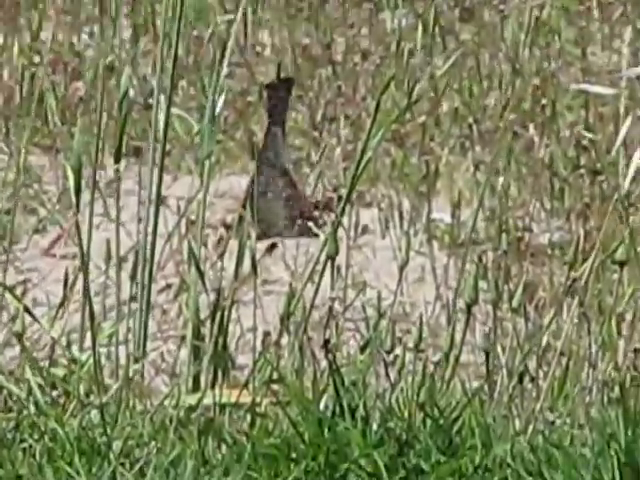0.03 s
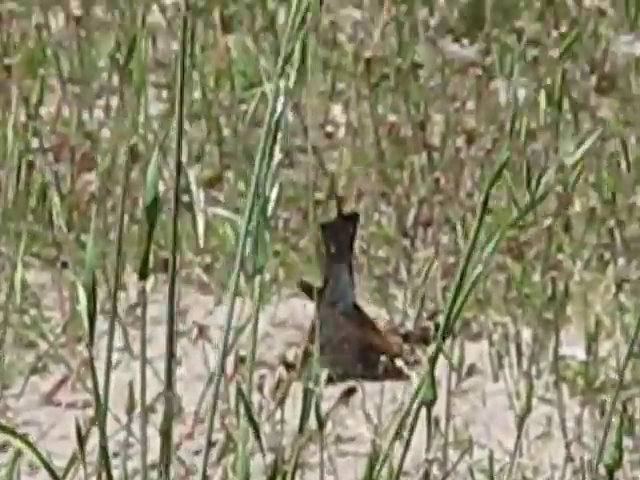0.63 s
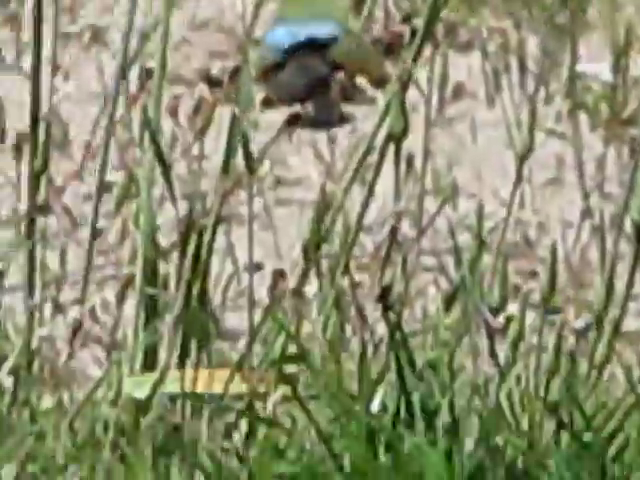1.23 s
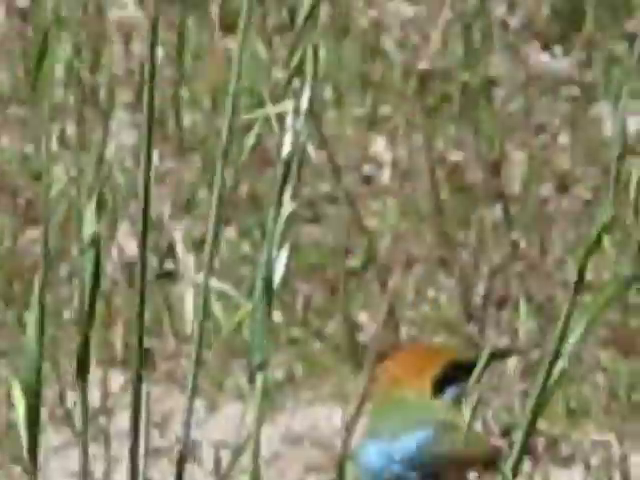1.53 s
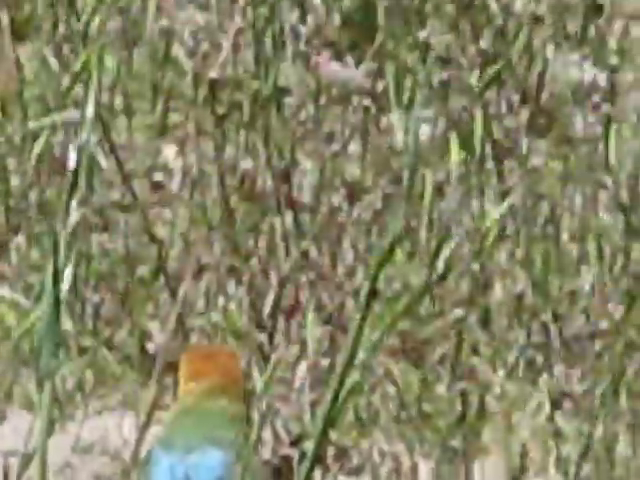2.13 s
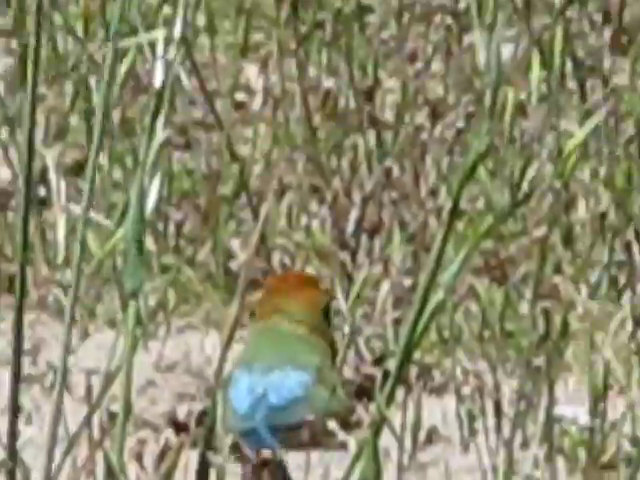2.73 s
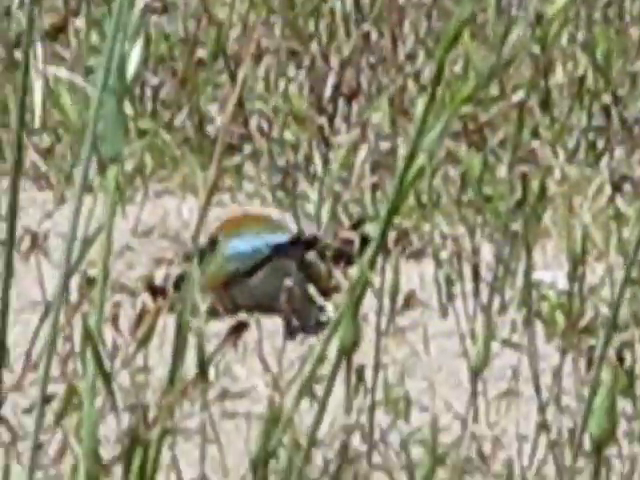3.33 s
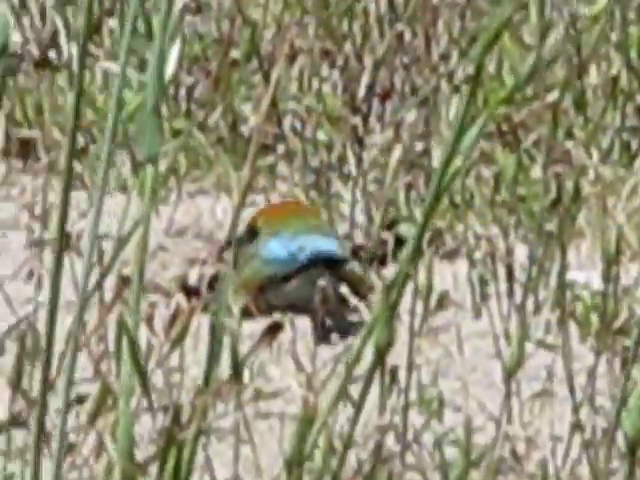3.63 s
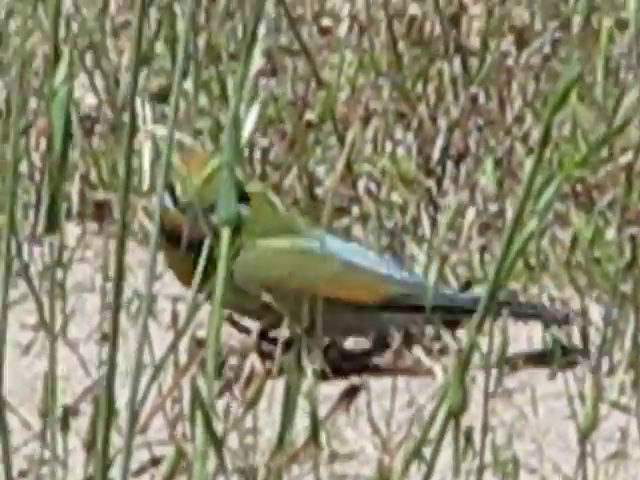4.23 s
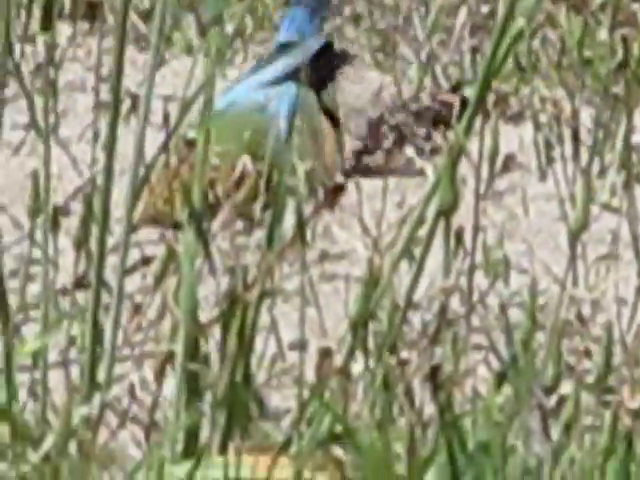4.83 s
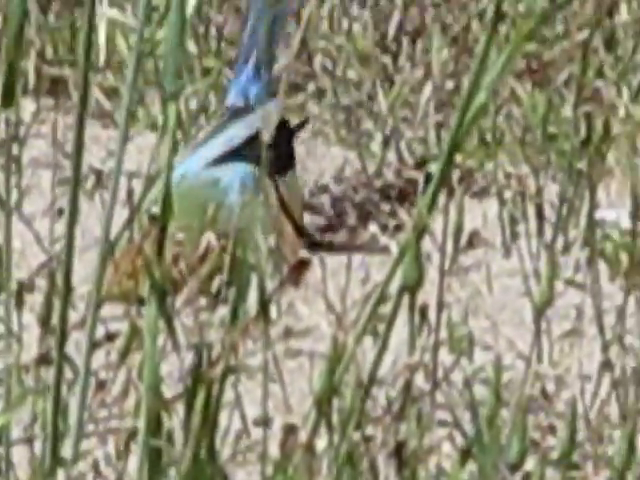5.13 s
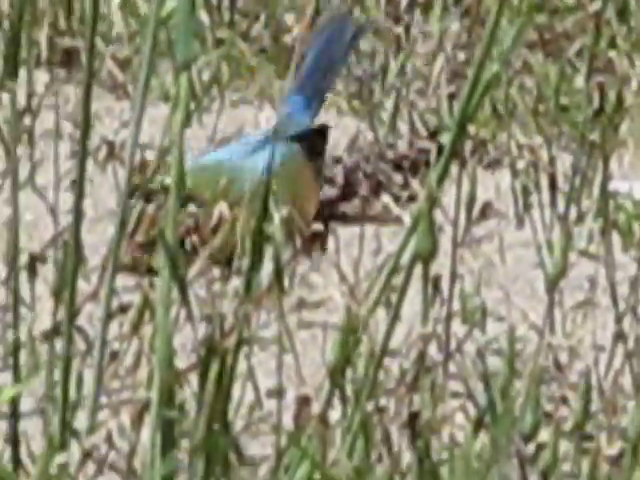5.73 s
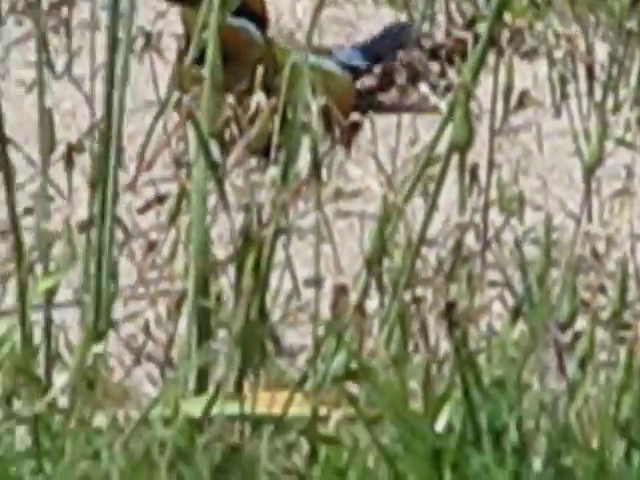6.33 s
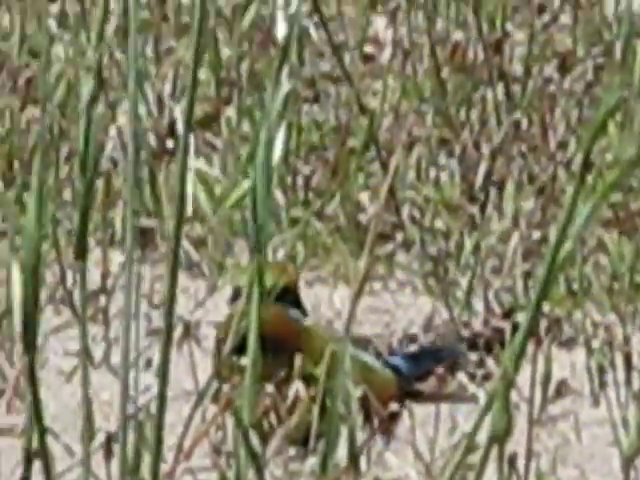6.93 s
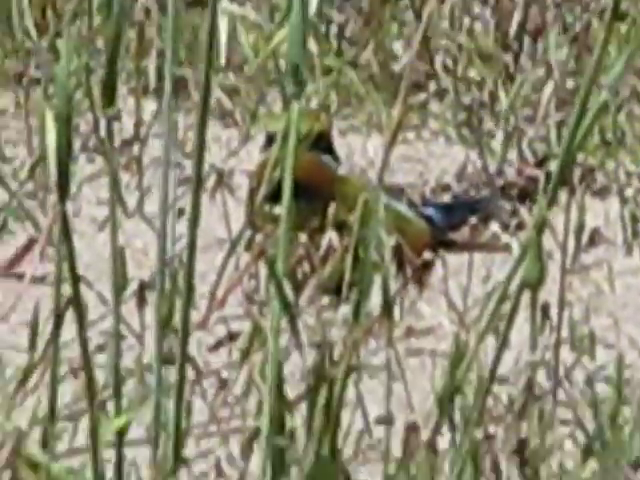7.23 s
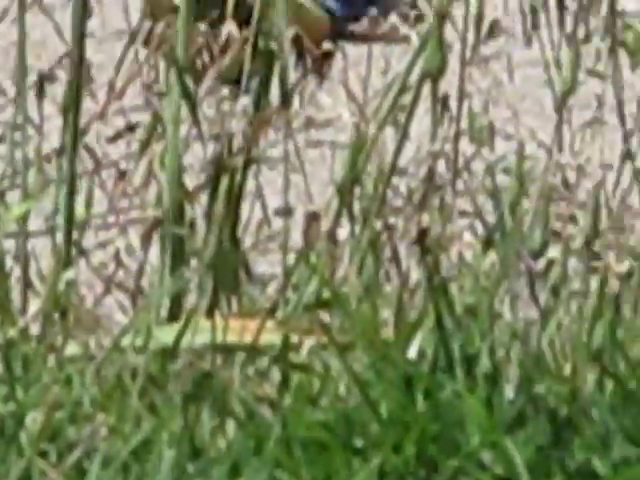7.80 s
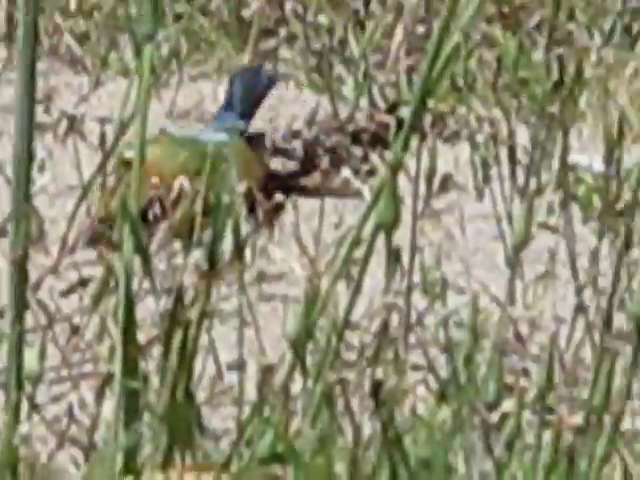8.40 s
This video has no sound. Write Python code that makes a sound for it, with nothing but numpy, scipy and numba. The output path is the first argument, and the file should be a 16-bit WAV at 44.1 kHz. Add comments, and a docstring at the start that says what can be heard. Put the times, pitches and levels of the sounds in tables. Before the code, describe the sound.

Outdoors in a garden, a low hum of far traffic and an even airy hiss run throughout. A bird keeps giving soft chirps, each a bright pip sliding into a weak purr. Early on, a short run of rising whistles comes from another bird, and a single loud click hits the microphone, after which the background dips and creeps back. Faint falling whistles and small close ticks come occasionally as the chirps carry on.

```python
"""A bee-eater repeats a soft slurred call in a garden; two other birds whistle further off.
Each note is a near sine from the syrinx, with a scattered tail. Distant traffic drones under a
steady hiss of air, and the camera's electronics add a thin whine. Small ticks sound close by.
One loud knock rings the camera body and overloads it; its gain control ducks all and creeps back."""
import sys
import numpy as np
from scipy import signal
from scipy.fft import rfft, irfft
from scipy.io import wavfile
from scipy.ndimage import uniform_filter1d, minimum_filter1d
from numba import njit

SR = 44100
rng = np.random.default_rng(int(sys.argv[2]) if len(sys.argv) > 2 else 0)


def waveform_to_disk(signal):
    """Save audio, clipped to [-1, 1], as 16-bit WAV at the path in sys.argv[1]."""
    frames = np.transpose(np.atleast_2d(signal))
    scaled = np.clip(frames, -1, 1) * 32767
    samples = np.round(scaled).astype(np.int16)
    wavfile.write(sys.argv[1], SR, samples)


N = 381906
T = np.arange(N) / SR


def undb(db):
    """Decibels to gain."""
    return 10 ** (np.asarray(db) / 20)


def unit(x):
    """Scale to rms 1."""
    return x / np.sqrt(np.mean(x ** 2))


def add(out, start_s, x):
    """Mix x into out from start_s."""
    start = int(round(start_s * SR))
    a, b = max(start, 0), min(start + x.shape[-1], N)
    out[..., a:b] += x[..., a - start:b - start]


def colour(x, points):
    """Filter by a (Hz, dB) spectrum."""
    hz, db = np.transpose(points)
    bin_hz = np.maximum(np.arange(N // 2 + 1) * SR / N, 1)
    return irfft(rfft(x) * undb(np.interp(np.log(bin_hz), np.log(hz), db)), N)


def band(x, hz, width_hz, stages=1):
    """One broad resonance, applied once per stage."""
    for _ in range(stages):
        x = signal.lfilter(*signal.iirpeak(hz, hz / width_hz, fs=SR), x)
    return x


def walk(rate_hz, size=N):
    """Smooth random wander, spread near 1."""
    step = int(SR / rate_hz)
    held = np.repeat(rng.standard_normal(size // step + 3), step)
    return unit(uniform_filter1d(uniform_filter1d(held, step), step))[step:step + size]


def slide(x, at, spread):
    """Smooth step from 0 to 1, centred on at."""
    return .5 + .5 * np.tanh((x - at) / (2 * spread))


def chirp(times_s, hz, db, flutter_hz, flutter, jitter, rough_db, third_db=-21, fourth_db=-28):
    """Syrinx note: a pulsing, unsteady near sine along a pitch and level contour."""
    t = np.arange(int(times_s[-1] * SR)) / SR
    pitch_hz = np.interp(t, times_s, hz) * (1 + jitter * walk(350, len(t)))
    phase = 2 * np.pi * np.cumsum(pitch_hz) / SR
    tone = np.sin(phase) + undb(third_db) * np.sin(3 * phase) + undb(fourth_db) * np.sin(4 * phase)
    pulse = 1 + flutter * np.cos(2 * np.pi * flutter_hz * (t - times_s[1]))
    level = undb(np.interp(t, times_s, db) + rough_db * walk(224.7, len(t)))
    return np.sqrt(2) * level * pulse * signal.windows.tukey(len(t), .08) * tone


def garden(x, lag_ms, right_db, echo_db, t60_s):
    """Sound reaches the left microphone lag_ms late; fences and trees scatter a short tail."""
    t = np.arange(SR // 2) / SR
    scatter = rng.standard_normal((2, len(t))) * undb(-60 * t / t60_s) * (t > .012)
    scatter /= np.sqrt(np.sum(scatter ** 2, axis=1, keepdims=True))
    direct = np.array([np.interp(T - lag_ms / 1000, T, x), x * undb(right_db)])
    return direct + undb(echo_db) * signal.fftconvolve(x[None], scatter, axes=1)[:, :N]


def bee_eater(call_s=.17, pip_s=.0161, bounce_s=.019, bounce_db=-15):
    """Each call leaps to a bright pip, sags in a weak purr and lifts to a closing note."""
    # Each row: start in seconds, pip in Hz, closing note in Hz, pip in dB, closing note in dB.
    calls = [(-.135, 2380, 2100, -36, -40.5), (.382, 2350, 2120, -31, -40), (1.603, 2305, 2050, -36, -44),
             (2.153, 2385, 2060, -36.5, -43), (2.723, 2423, 2030, -32.5, -45),
             (3.361, 2300, 2015, -38, -47), (4.046, 2283, 1925, -36.5, -43),
             (5.345, 2350, 1987, -33.5, -43), (5.861, 2380, 2207, -30, -38.5),
             (6.426, 2275, 1910, -34, -43), (7.030, 2370, 1904, -33, -47),
             (7.851, 2240, 2056, -35.5, -43.5), (8.432, 2420, 2054, -29, -42)]
    # A thin high overtone brightens the closing note of two calls; a few quiet trills fall between calls.
    # Each row: start in seconds, first and last pitch in Hz, length in seconds, closing level in dB.
    overtones_and_trills = [(1.487, 5900, 6280, 0.048, -51), (2.265, 5900, 6200, .05, -54),
                            (3.152, 2080, 2070, 0.088, -49), (3.476, 5840, 6250, .05, -56),
                            (4.514, 1900, 2120, 0.129, -45)]
    out = np.zeros(N)
    for start_s, pip_hz, end_hz, pip_db, end_db in calls:
        dip_hz, dip_db = .87 * end_hz, end_db - 8.5
        # Contour points: time in seconds, pitch in Hz, level in dB.
        pip = [(0, .8 * pip_hz, pip_db - 14), (pip_s / 2, .94 * pip_hz, pip_db - 9),
               (pip_s, pip_hz, pip_db), (.026, pip_hz, pip_db - 17)]
        sag = [(.044, .47 * (pip_hz + dip_hz), pip_db - 8.5), (.058, 1.04 * dip_hz, dip_db - 9),
               (.526 * call_s, dip_hz, dip_db)]
        lift = [(.68 * call_s, .49 * (dip_hz + end_hz), dip_db), (.91 * call_s, end_hz, end_db),
                (call_s, end_hz, end_db - 9)]
        contour = np.transpose(pip + sag + lift)
        add(out, start_s, chirp(*contour, flutter_hz=70, flutter=.4, jitter=.02, rough_db=2.5))
    for start_s, first_hz, last_hz, length_s, db in overtones_and_trills:
        contour = np.transpose([(0, first_hz, db - 4), (.008, first_hz, db - 7),
                                (length_s / 2, last_hz, db - 9), (length_s, last_hz, db)])
        add(out, start_s, chirp(*contour, flutter_hz=42, flutter=.91, jitter=.013, rough_db=-2))
    bounce = undb(bounce_db) * np.interp(T - bounce_s, T, out)  # one echo beats against the slur
    return garden(out + bounce, lag_ms=.065, right_db=-2.5, echo_db=-8.5, t60_s=.45)


def traffic(rumble_db=-43, roar_db=-38.5, right_lead_ms=.093):
    """Far engines over their blurred rumble and the road's roar; tyres whine as each car passes."""
    # Each row: frequency in Hz, relative density in dB.
    roar_spectrum = [(15, 17), (30, 9.5), (55, 15), (90, 13.5), (160, 10), (235, 3), (300, 4), (600, -0.5),
                     (800, 0.5), (1200, -5), (1500, -7), (2200, -9.5), (3300, -14), (4500, -32)]
    # Each row: closest approach in seconds, half length in seconds, tyre level in dB.
    passes = [(4.0, 0.51, -50), (5.502, 0.44, -51), (6.9, 0.21, -49), (8.2, 1, -55)]
    rumble = unit(band(rng.standard_normal(N), hz=88, width_hz=36.5, stages=2))
    rumble *= undb(rumble_db - 1.9 * walk(3.1))
    roar = unit(colour(rng.standard_normal(N), roar_spectrum)) * undb(roar_db + .72 * walk(7.1))
    pass_power = sum(undb(db) ** 2 / (1 + ((T - at_s) / half_s) ** 2) ** 2
                     for at_s, half_s, db in passes)
    tyres = unit(band(rng.standard_normal(N), hz=1060, width_hz=220, stages=2)) * np.sqrt(pass_power)
    road = engines() + rumble + roar + tyres
    return np.array([road, np.interp(T + right_lead_ms / 1000, T, road)])


def air(hiss_db=-47, waver_db=.7):
    """Diffuse hiss of grass, leaves and microphones, unrelated left and right."""
    # Each row: frequency in Hz, relative density in dB.
    spectrum = [(100, 6), (400, -4.5), (1200, -1), (2000, -2), (2700, -3), (3300, 3), (3900, -2),
                (4600, -8.5), (6500, -12), (8000, -11), (10000, -17.5), (12500, -19.5), (15700, -27)]
    return unit(colour(rng.standard_normal((2, N)), spectrum)) * undb(hiss_db - waver_db * walk(16))


def camera_whine(hz=7867.1, frame_hz=29.97, left_db=-62, right_db=-66):
    """The electronics sing a thin tone that restarts with every frame."""
    return np.sqrt(2) * np.sin(2 * np.pi * hz * (T % (1 / frame_hz))) * undb([[left_db], [right_db]])


def engines(rough=.34, fade_s=.24):
    """Each far engine swells, glides in pitch as it pulls or slows, and fades."""
    # Each row: start and length in seconds, first and last pitch in Hz, level in dB.
    glides = [(0.351, 1.3, 84, 80.9, -40), (1.501, 0.99, 102, 100.8, -39), (2.199, 0.84, 78, 83.9, -38),
              (2.7, 0.75, 118, 134.5, -39), (4.001, 1.45, 111, 62.26, -39.5),
              (6.352, 2.54, 81, 105.5, -39.5)]
    out = np.zeros(N)
    for start_s, length_s, first_hz, last_hz, db in glides:
        t = np.arange(int(length_s * SR)) / SR
        hz = first_hz * (last_hz / first_hz) ** (t / length_s)
        phase = 2 * np.pi * np.cumsum(hz) / SR
        drone = (1 + rough * walk(45.2, len(t))) * np.sin(phase)
        drone += rough * walk(44.5, len(t)) * np.cos(phase)
        fade = np.minimum(np.minimum(t, length_s - t) / fade_s, 1)
        add(out, start_s, undb(db) * unit(drone) * fade)
    return out


def falling_whistles(high_hz=5600, middle_hz=4880, low_hz=3280, before_drop_db=-8.5):
    """A second bird: thin, raspy whistles hang high, step down, then drop and grow louder."""
    # Each row: start and length in seconds, level after the drop in dB.
    whistles = [(0.683, .155, -51), (4.446, .11, -51)]
    out, progress = np.zeros(N), np.linspace(0, 1, 41)
    step, drop = slide(progress, at=.28, spread=.0407), slide(progress, at=.62, spread=.0407)
    hz = high_hz + (middle_hz - high_hz) * step + (low_hz - middle_hz) * drop
    voice = dict(flutter_hz=110, flutter=.6, jitter=.022, rough_db=3)
    for start_s, length_s, db in whistles:
        add(out, start_s, chirp(progress * length_s, hz, db + before_drop_db * (1 - drop), **voice))
    return garden(out, lag_ms=-.04, right_db=0, echo_db=-1.5, t60_s=.5)


def rising_whistles(length_s=.095, low_hz=2200, high_hz=2980, flick_s=.04, flick_top_hz=3550):
    """A third bird, to the right: each whistle swells as it slides up, fades and ends in a flick."""
    # Each row: start in seconds, whistle peak in dB, flick peak in dB.
    whistles = [(.900, -32.5, -45), (1.088, -31.5, -46), (1.283, -30.5, -47), (1.479, -33.5, -51),
                (1.674, -33, -50)]
    peak_s, attack_db_per_s, fade_db_per_s = .046, 310, 380
    out, progress = np.zeros(N), np.linspace(0, 1, 41)
    t, arch = progress * length_s, (2 * progress - 1) ** 2
    hz = low_hz + (high_hz - low_hz) * slide(t, at=.03, spread=.00665)
    swell_db = np.minimum(attack_db_per_s * (t - peak_s), fade_db_per_s * (peak_s - t))
    flick_hz = flick_top_hz * (1 - .06 * arch)
    voice = dict(flutter_hz=90, flutter=.25, jitter=.018, rough_db=2, third_db=-38, fourth_db=-45)
    for start_s, db, flick_db in whistles:
        add(out, start_s, chirp(t, hz, db + swell_db, **voice))
        flick = chirp(progress * flick_s, flick_hz, flick_db - 9 * arch, **voice)
        add(out, start_s + length_s - flick_s / 10, flick)
    return garden(out, lag_ms=.2, right_db=2, echo_db=-5.5, t60_s=.63)


def ticks(width_ratio=1.03):
    """Small dry ticks, taps and scuffs close by: short bursts of band noise."""
    # Each row: start in seconds, level in dB, centre in Hz, time to peak in seconds.
    bursts = [(.972, -32, 1090, .0023), (1.085, -32.5, 1270, 0.0027), (1.650, -31, 950, 0.0026),
              (2.753, -36.5, 913, 0.0051), (2.955, -38, 891, .003), (3.208, -48, 12000, .0006),
              (3.950, -43, 5670, .004), (5.298, -48, 7020, .001), (8.207, -53, 12000, .002)]
    out, t = np.zeros((2, N)), np.arange(SR // 10) / SR
    for start_s, db, hz, rise_s in bursts:
        width_hz = min(width_ratio * hz, SR / 4)
        noise = band(rng.standard_normal((2, len(t))), hz, width_hz, stages=2)
        add(out, start_s, undb(db) * unit(noise) * t / rise_s * np.exp(1 - t / rise_s))
    return out


def knock(left_db=-2, left_phase_rad=1.3, build_s=.00061, rattle_db=-16, rattle_s=.0032, crack_s=.00084):
    """A quick cluster of contacts rings the camera body, shaking the two microphones out of step."""
    # Each row: start in seconds, thump gain in dB, crack level in dB.
    contacts = [(1.2171, 1.5, -43), (1.2234, -0.5, -19), (1.2253, 13, -11.5), (1.2321, -12, -21),
                (1.2348, 8, -19), (1.2372, 3, -35)]
    # Damped body. Each row: frequency in Hz, t60 in seconds, relative level in dB.
    body_modes = [(300, 0.03, -19), (575, 0.068, -20.5), (806, 0.042, -13.5), (1013, 0.017, -9.5),
                  (1165, 0.017, -3), (1513, 0.04, -12), (1940, 0.014, -34), (2460, 0.0082, -3.5),
                  (3140, 0.0097, -31), (3140, 0.02, -17), (5850, 0.0047, -25)]
    # A small metal part that rings on. Each row: frequency in Hz, t60 in seconds, level in dB.
    metal_modes = [(1352, .43, -24), (1845, .35, -29.5)]
    out, t = np.zeros((2, N)), np.arange(SR // 2) / SR
    phase = np.array([[left_phase_rad], [0]])
    body, metal = (
        sum(undb(db - 60 * t / t60_s) * np.sin(2 * np.pi * hz * t + phase) for hz, t60_s, db in modes)
        for modes in (body_modes, metal_modes))
    push = 1 - np.exp(-t / build_s)
    for start_s, thump_db, crack_db in contacts:
        rattle_noise, crack_noise = rng.standard_normal((2, 2, len(t)))
        rattle_noise = band(band(rattle_noise, hz=2070, width_hz=1200), hz=1660, width_hz=1800)
        rattle = undb(rattle_db) * unit(rattle_noise) * np.exp(-t / rattle_s)
        crack = unit(band(crack_noise, hz=7100, width_hz=4700)) * np.exp(-t / crack_s)
        add(out, start_s, undb(thump_db) * push * (body / 2 + rattle) + undb(crack_db) * crack)
    hardest_s = max(contacts, key=lambda contact: contact[1])[0]
    add(out, hardest_s, push * metal)
    return out * undb([[left_db], [0]])


def scene():
    """Birds, close noises and steady background, in stereo."""
    birds = bee_eater() + rising_whistles() + falling_whistles()
    return birds + knock() + ticks() + traffic() + air() + camera_whine()


@njit
def follow(x, attack, release):
    """Envelope follower with separate rise and fall rates per sample."""
    envelope, level = np.empty(len(x)), 0.
    for i in range(len(x)):
        level += (x[i] - level) * (attack if x[i] > level else release)
        envelope[i] = level
    return envelope


def gain_control(x, threshold_db=-21, range_db=16, attack_s=.035, hold_s=.088, release_s=.5):
    """A peak over the threshold pulls the gain down; it holds, then recovers slowly."""
    peak_db = 20 * np.log10(np.abs(x).max(axis=0) + 1e-9)
    over_db = np.clip(peak_db - threshold_db, 0, range_db)
    half_hold = int(hold_s * SR / 2)
    held_db = -minimum_filter1d(-over_db, 2 * half_hold + 1, origin=half_hold)
    return x * undb(-follow(held_db, 1 / (attack_s * SR), 1 / (release_s * SR)))


def record(dry, top_hz=15800):
    """Unequal microphone ports, gain control, overload and a steep top cut."""
    # Each row: frequency in Hz, right port's excess over the left in dB.
    right_bias = [(80, .5), (400, .6), (1000, 1), (1700, 2.5), (2650, 4.5), (3500, 1), (4500, -.7),
                  (12000, -.5)]
    ports = np.array([colour(channel, [(hz, side * db / 2) for hz, db in right_bias])
                      for channel, side in zip(dry, (-1, 1))])
    clipped = np.clip(gain_control(ports), -1, 1)
    return signal.sosfilt(signal.ellip(10, .2, 70, top_hz, fs=SR, output="sos"), clipped)


dry = scene()
out = record(dry)
waveform_to_disk(out)
```